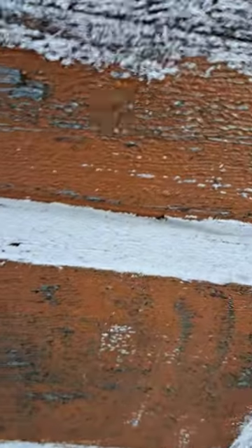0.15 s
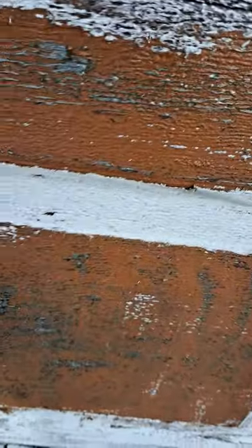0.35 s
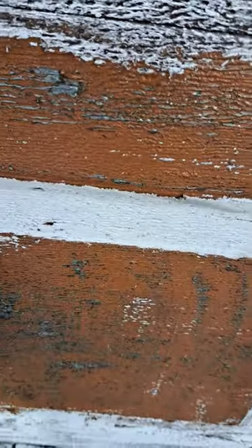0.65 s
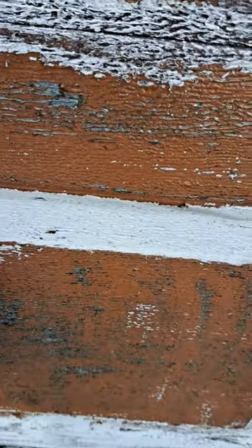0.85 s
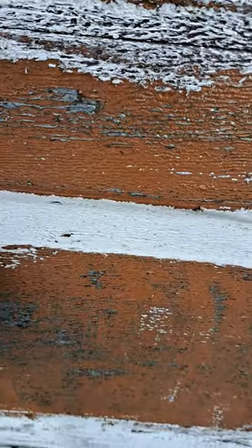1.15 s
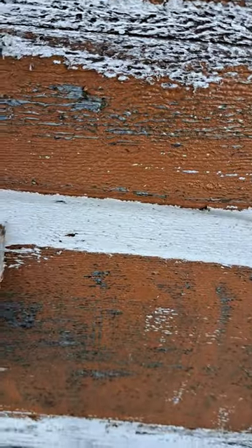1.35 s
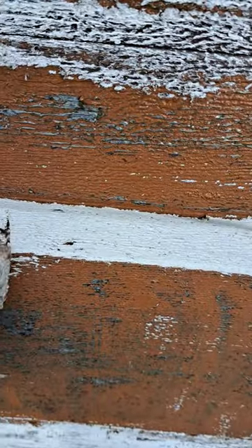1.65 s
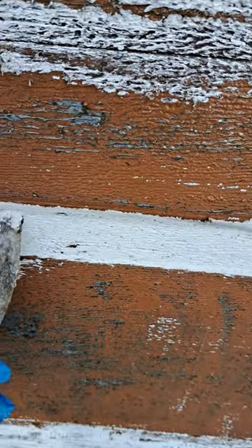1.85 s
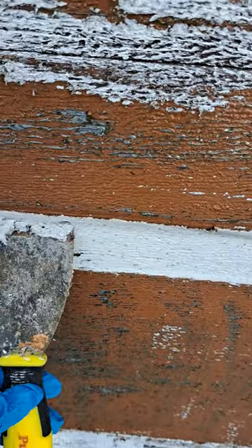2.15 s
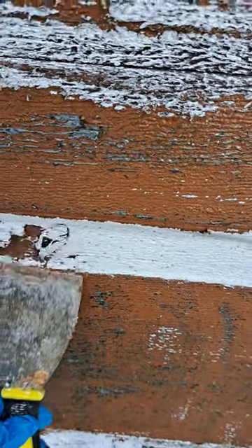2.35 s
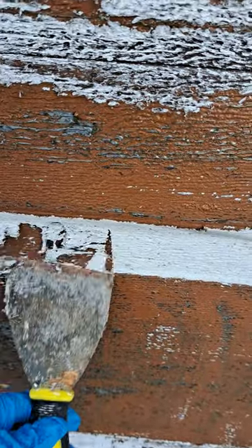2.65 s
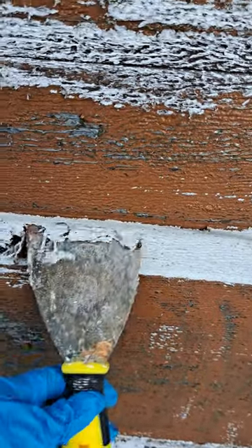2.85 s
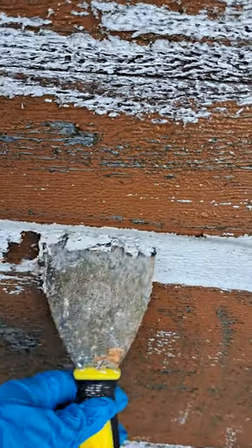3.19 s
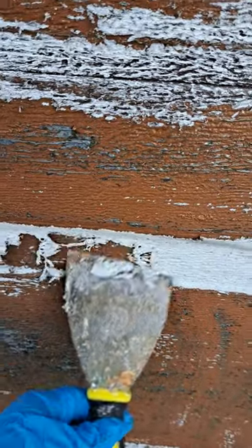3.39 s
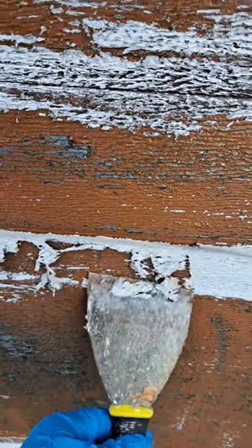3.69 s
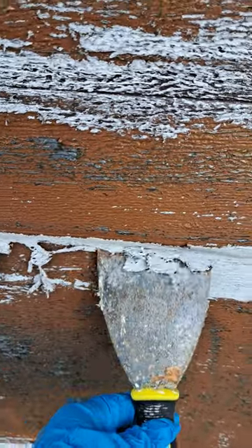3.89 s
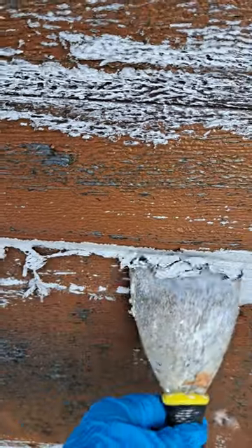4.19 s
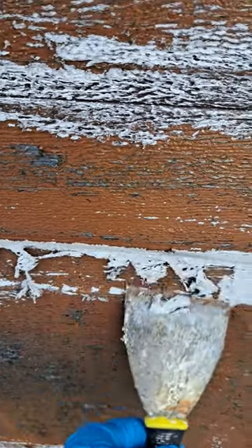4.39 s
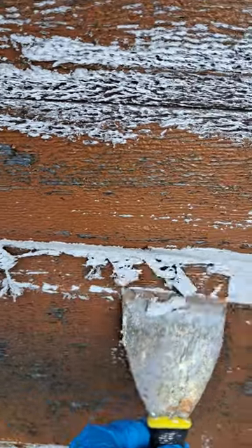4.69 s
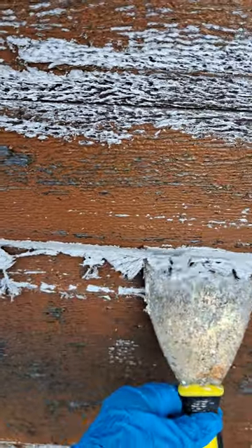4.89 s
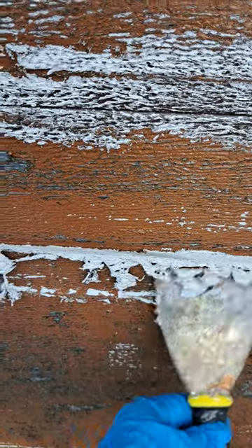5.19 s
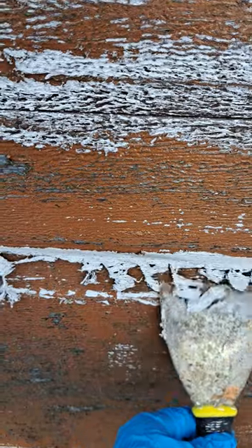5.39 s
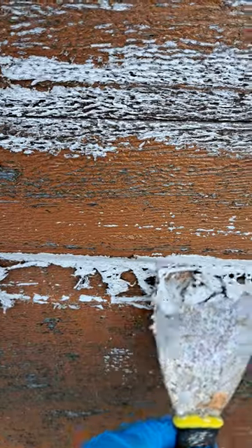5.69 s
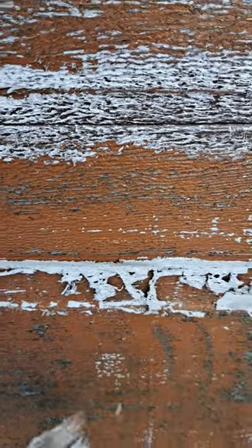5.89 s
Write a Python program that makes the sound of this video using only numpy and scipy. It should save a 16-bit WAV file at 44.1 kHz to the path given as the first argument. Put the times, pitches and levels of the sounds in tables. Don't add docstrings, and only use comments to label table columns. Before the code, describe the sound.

Very close stereo pickup of a metal scraper on a wooden door. First come low handling bumps and a soft bright cloth brush, then short gritty pushes that each end in a woody knock with a brief dull blade ring. Dry paint flakes snap and tick. Strokes settle into a quick regular to-and-fro, about three pushes a second, ending in hollow chatter. Faint workshop hum, small dry room.

```python
import sys
import numpy as np
from scipy import signal
from scipy.fft import rfft, irfft, next_fast_len
from scipy.io import wavfile

SR = 44100
rng = np.random.default_rng(int(sys.argv[2]) if len(sys.argv) > 2 else 0)


def invert_db(x):
    u = np.asarray(x, float) / 20
    return 10 ** u


def put_to_file(sound):
    columns = np.atleast_2d(sound).T
    safe = np.clip(columns, -1, 1)
    whole_steps = np.round(safe * 32767)
    wavfile.write(sys.argv[1], SR, whole_steps.astype(np.int16))


N = 266364
SIZE = next_fast_len(N + SR)
BINS_HZ = np.maximum(np.arange(SIZE // 2 + 1) * SR / SIZE, 1)
STEP = 64

# [f/Hz, level/dB]
FLOOR = [(15, -71), (25, 22.5), (124, 1), (296, -17), (510, -22), (584, -38), (927, -26), (1400, -31),
         (1800, -14), (2300, -28), (2900, -22), (9080, -29.5), (12600, -36), (15200, -43), (16500, -59)]
FLOOR_DB = -52
DUCK_S, DUCK_DB = 0.12, 1

# [f/Hz, level/dB per Hz]
HANDLING = [(0.0, -61), (0.27, -59.5), (0.32, -50), (0.41, -51), (0.46, -39.5), (0.56, -48), (0.62, -39.5),
            (0.8, -41), (0.87, -64), (0.93, -35), (1.25, -42.5), (1.6, -52.5), (1.83, -38), (2.2, -68),
            (2.54, -51.5), (3.3, -41.5), (4.1, -44.5), (4.3, -43), (4.9, -38), (5.3, -48.5), (5.68, -40.5),
            (5.85, -44), (6.04, -62)]
RUMBLE = [(20, -33), (45, 1.5), (90, -5), (130, -3), (170, -11), (230, -16.5), (330, -29.5), (600, -65)]
RUMBLE_ALIKE = 0.25

# [t/s, peak level/dB, f/Hz, left-right level/dB]
GRIPS = [(0.0, -41, 55, 3), (0.298, -22.5, 75.6, 0), (0.361, -29, 108, 3), (0.442, -28.5, 108, 29),
         (0.499, -26, 130, 17), (0.576, -27, 129, 16), (0.609, -26, 101, 15), (0.665, -32, 108, 0),
         (0.723, -22.5, 81.4, 12), (0.752, -22.5, 97, 7), (3.718, -29.5, 202, -43),
         (3.732, -18.5, 253, -33.5), (5.071, -28.5, 69.3, 19), (5.8, -30, 65, 19)]
GRIP_CYCLES = 6.4

# [t/s, bright hiss level/dB, narrow whistle level/dB]
SLEEVE = [
    (0.3, -78, -85),
    (0.4, -62, -60.5),
    (0.75, -74, -59),
    (0.93, -56, -58),
    (1.2, -62.5, -66),
    (1.45, -62, -75),
    (1.585, -71, -75),
    (1.6, -80, -80),
    (1.75, -83, -85),
]
# [f/Hz, level/dB per Hz]
SLEEVE_HISS = [(2000, -30), (3700, -6), (6000, -10), (9000, -11), (12400, -9), (15600, -9), (16500, -30)]
WHISTLE_HZ, WHISTLE_T60_S = 1760, 0.0045

# [f/Hz, left lead/rad]
PORT_BALANCE = [(60, -8), (150, 2.5), (380, -1), (950, -2.5), (2380, -6), (5980, -2), (15000, 1)]
PORT_PHASE = [(100, 0.056), (400, 0.29), (800, 0.64), (1400, 1.58), (3000, 1.62), (6000, 1.53),
              (10000, 2.15), (16000, 0.88)]
ROOM_T60_S, ROOM_DB, WALL_CUT_HZ = 0.17, -13.5, 1340

# [t/s, peak level/dB, brightness/dB per octave, tail level/dB]
FLAKES = [(0.108, -27.5, -0.5, 9), (0.198, -34, -7, -15), (0.24, -47, -4, -8), (0.384, -54.5, -3.5, 16.5),
          (0.4217, -45, -5, 9), (0.4646, -41, -2, -4), (0.697, -20.5, -3.5, -36), (0.771, -23.5, -8, -25),
          (0.967, -17.5, -6.5, 3.5), (1.018, -46, 2, -20), (1.178, -46, 3, -20), (1.2955, -45, -4, -15),
          (1.3379, -36, -5, 2), (1.4096, -35, -7, 6), (1.4955, -43, -6, -15), (1.5235, -42, 6, -15),
          (1.556, -40, 2, -10), (1.572, -36, 0, -15), (1.587, -47, -3, -20), (1.6816, -39, 0, -10),
          (1.7377, -12.5, -7, -9.5), (1.978, -38, -6, 9), (2.022, -13, -9, -17), (3.9873, -52, -10, -27),
          (4.064, -26.5, 1, -19), (4.9573, -21, -7.5, -14), (5.354, -24, 0.5, -25), (5.429, -40, 1, -4),
          (5.73, -23.5, -3.5, 9), (5.754, -9.5, -4.5, -10.5), (5.2942, -9, -1, -35), (5.59, -4.5, 1.5, -41)]
FLAKE_PAN_DB = -2
FLAKE_SCATTER = 0.7
FLAKE_BUMPS_DB, FLAKE_BUMP_HZ = 3, 500

# [t/s, peak level/dB]
CRACK = [
    (3.6665, -6),
]
# [f/Hz, level/dB, t60/s]
CRACK_MODES = [(2080, -6, 0.026), (2700, 1, 0.0057), (4100, 5.5, 0.0024), (4900, -6.5, 0.0017),
               (7000, 4.5, 0.0045), (8000, 14, 0.0034), (10520, 5.5, 0.0037), (12170, 8.5, 0.0027),
               (15200, -18, 0.0062)]

# [t/s, peak level/dB, f/Hz]
CHIPS = [(0.5796, -21, 2100), (0.774, -36, 3130), (1.081, -5, 1680), (1.4294, -36, 1740), (1.826, 1, 2050),
         (2.125, -0.5, 1600), (2.127, -14, 2060), (2.401, -8.5, 1750), (2.4558, -10, 1840),
         (2.5544, -28, 1680), (2.8065, -34, 1650), (2.8385, -13, 1710), (2.86, 0, 1716), (3.129, -11, 1670),
         (3.155, -16, 1600), (3.2994, -35, 1690), (3.4694, -23, 1740), (3.4944, -24, 2000),
         (3.8427, -30, 1600), (3.8601, -23, 1720), (3.875, -17, 1670), (4.1869, -22, 1730),
         (4.2118, -24, 1710), (4.2344, -16, 2000), (4.4184, -28, 1810), (4.5216, -20, 1810),
         (4.5444, -25, 1660), (4.8534, -19, 1670), (4.8844, -29, 1690), (4.9294, -33, 1520),
         (5.23, -31, 1730), (5.2644, -27, 1800), (5.545, -17, 1270), (5.545, -20, 1280),
         (5.563, -13.5, 1800), (5.8217, -18, 1820), (5.8644, -27, 1810), (5.8794, -33, 1450),
         (6.0033, -35, 1600)]
CHIP_CYCLES, CHIP_DB = 36, -6

# [t/s, peak level/dB,
# f/Hz, t60/s]
SLIPS = [(1.067, -13.5, 279, 0.11), (1.082, -14, 610, 0.021), (1.413, -35, 291, 0.065),
         (1.464, -18, 250, 0.065), (1.721, -21.5, 385, 0.043), (1.992, -26, 306, 0.057),
         (2.106, -33, 610, 0.035), (2.123, -10.5, 620, 0.024), (2.19, -9, 684, 0.053),
         (2.204, -40, 343, 0.079), (2.215, -21.5, 548, 0.095), (2.245, -27, 595, 0.064),
         (2.46, -23, 288, 0.034), (2.528, -16.5, 759, 0.12), (2.54, -20, 634, 0.1),
         (2.787, -31, 304, 0.059), (2.817, -19, 317, 0.034), (2.844, -11, 672, 0.068),
         (2.86, -17, 710, 0.067), (3.008, -15, 730, 0.04), (3.129, -27, 274, 0.072), (3.19, -20, 591, 0.13),
         (3.327, -23, 425, 0.053), (3.34, -34, 985, .12), (3.492, -10.5, 762, 0.06), (3.535, -26, 575, .1),
         (3.861, -30, 273, 0.032), (3.916, -16.5, 400, 0.1), (4.051, -31.5, 1084, 0.078),
         (4.27, -19, 407, 0.11), (4.34, -40, 990, 0.18), (4.395, -18, 282, 0.068), (4.422, -21, 630, 0.035),
         (4.597, -25, 380, 0.14), (4.713, -24, 386, 0.058), (4.877, -13, 392, 0.033),
         (5.217, -15, 322, 0.037), (5.294, -15.5, 996, 0.045), (5.325, -16.5, 283, .15),
         (5.36, -24, 330, 0.072),
         (5.36, -24, 330, 0.072), (5.498, -6, 438, 0.053), (5.521, -16, 406, 0.066),
           (5.545, -9, 381, 0.057), (5.565, -16, 386, 0.089), (5.591, -7, 428, 0.061),
           (5.751, -23, 448, 0.088), (5.814, -11, 344, 0.036), (5.841, -5, 401, 0.038),
           (5.857, -8, 392, 0.081), (5.873, -12, 395, 0.056), (5.889, -12, 373, 0.05),
           (5.88, -29, 780, 0.063), (5.845, -23.5, 727, 0.27), (5.854, -13, 1165, 0.035),
           (5.982, -13.5, 373, .06), (6.003, -33, 432, 0.029)]
SLIP_SAG, SLIP_SAG_S, SLIP_RISE_S = 0.057, 0.081, 0.004

# [f/Hz, level/dB, t60/s]
JOLT = [(72, -12, 0.13), (97, 0, 0.054)]
# [f/Hz, level/dB, t60/s]
THUMP = [(120.3, 11.5, 0.12), (141.7, 16, 0.07), (180, -25, .1), (233, -31, 0.39)]
# [f/Hz, level/dB, t60/s]
PANEL = [(208.2, -5, 0.3), (231.5, -8.5, 0.19), (275, -8.5, 0.19), (290, -5, 0.025), (311.8, 1, 0.06),
         (391.3, -2.5, 0.056), (435, -15.5, 0.31), (474.4, -13.5, 0.26), (546, -2, 0.053),
         (594.4, 1, 0.042), (658, -2.5, 0.053), (759, -3, 0.056), (1036, 1, 0.015), (1022, -5, 0.036),
         (1168, -8.5, 0.037)]
# [f/Hz, level/dB, t60/s]
BLADE = [(1250, 12.5, 0.002), (1670, 9, 0.01), (1750, 2, 0.019), (2030, -3.5, 0.024), (1940, 0, 0.0068),
         (2163, -0.5, 0.011), (2675, -12.5, 0.011), (3600, -38.5, 0.0029), (3917, -24, 0.011)]
# [f/Hz, level/dB per Hz]
GRIT = [(530, -2.5), (900, -10), (1480, -5.5), (1720, -8.5), (2210, -4.5), (2900, -14), (3560, -10.5),
        (5940, -18), (6460, -15.5), (9200, -27), (11600, -19), (15300, -24), (16500, -36)]
GRIT_EDGES_HZ = [300, 1500, 2600, 4200, 6500, 10000, 17000]
FLECK_DB, FLECK_PER_S = 2.8, 110
HAND_DAMPING = 0.72
PANEL_WANDER_DB = 3.0
JUDDER_DB = 2.0
SHUDDER_DB = -1.5

# [t/s, peak level/dB, thump level/dB, blade ring level/dB, flake level/dB]
STOPS = [(1.068, -7.5, -15, -5.5, -42), (1.825, 2.5, -13, -6, -3), (2.123, -14, -5, 3.5, -14),
         (2.185, 2, -7, -8.5, -2), (2.398, -15, -30, -6, -16), (2.529, -6, -7.5, -6, -7.5),
         (2.844, -7, -28, 3, -12), (2.86, -3.5, -36, 6, -11), (3.172, 0, -12, 0.5, 1),
         (3.518, 4.5, -10.5, -8.5, -28), (3.89, 4.5, -10, -6.5, -6.5), (4.255, 3, -12, -13, -10),
         (4.585, 3.5, -7.5, -14.5, -4.5), (4.916, -11.5, 2, -7, -23), (5.294, -3.5, -19, -1, -2.5),
         (5.591, -1.5, -9, -2, -3), (5.844, -23, -20, -27, -4)]
STOP_SOFT_MS = 0.55
STOP_TILT_DB, STOP_TAIL_DB, STOP_PAN_DB = -10.5, -14.5, -2
# [t/s, peak level/dB, blade ring level/dB]
TOUCHES = [(1.048, -10.5, -17), (2.348, -21.5, -19), (2.454, -9.5, -3), (2.806, -15.5, 6),
           (2.996, -23, -10), (3.007, -14, -20), (3.438, -6, 1.5), (4.05, -23.5, 4.5), (4.186, -13.5, 5.5),
           (4.514, -11, 2), (4.853, -11.5, 8), (5.244, -17, -16)]
TOUCH_THUMP_DB, TOUCH_SOFT_MS = -7, 0.78
# [t/s, peak level/dB, thump level/dB, contact softness/ms]
BUMPS = [(0.301, -43, 21.5, 1.7), (0.906, -3, 3, 2.66), (1.208, 2, -0.5, 3.55), (1.45, -9.5, 2, 3.4),
         (3.729, -15, 3.5, 0.76), (5.339, -7, -12, 4.1), (5.376, -23, -46, 2.1), (5.458, -11.5, -2.5, 0.66),
         (5.494, -11.5, -8, 1.9), (5.54, -9.5, -27, 0.95), (5.955, -7, -1.5, 2.2), (6.003, -21, -23, 0.59)]
BUMP_BLADE_DB = -17
KNOCK_LAG_S = 0.001523
REBOUND_S, REBOUND_DB = 0.00445, -9.5

# [t/s, lean level/dB, grit level/dB, contact point's favoured f/Hz, its tilt/dB per octave]
SLIDE = [(0.0, -55.5, -66.5, 278, 8.5), (0.45, -55, -62.5, 223, 6), (0.94, -53, -56.5, 217, 3),
         (1.15, -34, -54.5, 238, -2.5), (1.46, -41, -54.5, 254, -1), (1.58, -64, -54.5, 268, 7),
         (1.61, -47, -65, 272, 7.5), (1.75, -36.5, -54.5, 343, -1.5), (2.05, -34.5, -53, 265, 1.5),
         (2.25, -36, -54.5, 316, 1.5), (2.42, -33, -69, 260, -2.5), (2.62, -30, -54, 302, -0.5),
         (2.84, -33.5, -64.5, 294, 4), (3.22, -25.5, -58, 290, 2), (3.7, -31.5, -61, 275, 0),
         (4.3, -28.5, -59, 321, 0.5), (5.05, -39, -55.5, 352, 4.5), (5.33, -32.5, -59, 275, -2),
         (5.5, -33, -51, 364, -0.5), (5.68, -38, -57.5, 287, 1), (5.85, -42, -53, 380, 5),
         (6.04, -31.5, -56, 394, 1)]
SLIDE_BLADE_DB, BLADE_FOLLOWS = -55.5, 0.72
# [start t/s, end t/s, rasp level/dB at start, at end, panel level above it/dB]
PUSHES = [(1.037, 1.091, -40, -33, 11), (1.73, 1.831, -55, -24.5, 14.5), (2.106, 2.206, -40, -41, 13),
          (2.448, 2.54, -32.5, -45.5, 13.5), (2.519, 2.576, -23.5, -41.5, 6.5),
          (2.782, 2.861, -44.5, -20.5, 7.5), (3.114, 3.178, -42.5, -18, 5.5),
          (3.434, 3.488, -29.5, -39.5, 10), (3.49, 3.53, -16.5, -28.5, 1), (3.832, 3.894, -36, -25, 9.5),
          (4.177, 4.263, -35.5, -20, 7), (4.507, 4.575, -30.5, -34.5, 6.5), (4.839, 4.921, -29, -30.5, 4.5),
          (5.224, 5.3, -33.5, -34, 10), (5.549, 5.608, -32.5, -40, 15), (5.692, 5.845, -65, -34.5, 15.5),
          (5.855, 5.9, -24, -60, 6)]
# [start t/s, end t/s, rasp level/dB at start, at end, panel above it/dB]
PULLS = [(0.22, 0.31, -81.5, -100, 36.5), (0.572, 0.61, -48, -53, -22), (1.202, 1.262, -61.5, -75, 39.5),
         (1.389, 1.537, -38.5, -54, 14), (1.659, 1.758, -67, -42.5, 20), (1.956, 2.02, -52, -62, 24),
         (2.33, 2.384, -55.5, -44, 10.5), (2.676, 2.75, -43.5, -69, 14), (2.992, 3.056, -34.5, -57, 1),
         (3.295, 3.395, -52.5, -44, 10), (4.032, 4.088, -42.5, -48.5, 10), (4.365, 4.432, -55.5, -40, 12.5),
         (4.686, 4.761, -48, -41, 9.5), (5.105, 5.158, -50, -56, 18.5), (5.47, 5.551, -50.5, -41.5, 22),
         (5.973, 6.04, -45.5, -50, 19.5)]
PUSH_GRIT_DB, PULL_GRIT_DB = -16.5, -14
DRAG_S, DRAG_DB = 0.0098, -11
SAG_S, SAG_OCTAVES = 0.0026, 0.16
LIFT_BEFORE_S, LIFT_S = 0.031, 0.015
LIFT_DB = [
    [-4],
    [0],
    [-5],
]
TURN_AFTER_S, TURN_S = 0.054, 0.023
TURN_DB = [
    [6],
    [-7],
    [-2],
]

TOP_HZ = 15700


def rms_one(x):
    return x / np.sqrt(np.mean(x ** 2) + 1e-20)


def in_time(rows, step=1):
    s, *columns = np.transpose(rows)
    return [np.interp(np.arange(0, N, step) / SR, s, column) for column in columns]


def at_bins(points):
    hz, value = np.transpose(points)
    return np.interp(np.log(BINS_HZ), np.log(np.maximum(hz, 10)), value)


def through(x, response):
    return irfft(rfft(x, SIZE) * response, SIZE)[..., :N]


def causal(spectrum):
    cepstrum = irfft(np.log(invert_db(at_bins(spectrum))), SIZE)
    cepstrum[1:SIZE // 2] *= 2
    cepstrum[SIZE // 2 + 1:] = 0
    response = np.exp(rfft(cepstrum))
    return response / np.sqrt(np.mean(np.abs(response) ** 2))


def highpass(x, hz, order=2):
    return signal.sosfilt(signal.butter(order, hz, "high", fs=SR, output="sos"), x)


def fade(x, seconds, step=1):
    lag = np.exp(-step / (seconds * SR))
    return signal.lfilter([1 - lag], [1, -lag], x)


def drift(rate, step=1):
    return np.interp(np.arange(0, N, step) * rate / SR, np.arange(2000), rng.standard_normal(2000))


def dips(times, width_s):
    t = np.arange(0, N, STEP) / SR
    return np.repeat(sum(np.exp(-((t - s) / width_s) ** 2) for s in times), STEP)[:N]


def ring(clicks, hz, t60):
    r, w = invert_db(-60 / (t60 * SR)), 2 * np.pi * hz / SR
    return signal.lfilter([0, np.sin(w)], [1, -2 * r * np.cos(w), r * r], clicks + 1e-18)


def stereo_noise(spectrum, alike):
    mid, side = through(rng.standard_normal((2, N)), causal(spectrum))
    alike = np.clip(alike, 0, 1)
    return np.sqrt((1 + alike) / 2) * mid + np.sqrt((1 - alike) / 2) * side * [[1], [-1]]


def floor(near):
    duck_db = DUCK_DB * np.tanh(fade(np.abs(near[0]), DUCK_S) / invert_db(-24.5))
    level_db = FLOOR_DB - 0.5 + duck_db + 0.72 * drift(4.2)
    return invert_db(level_db) * stereo_noise(FLOOR, alike=0.33)


def rumble():
    level_db = in_time(HANDLING)[0] + 9.5 + 2.7 * drift(16)
    return invert_db(level_db) * stereo_noise(RUMBLE, alike=RUMBLE_ALIKE)


def sleeve():
    hiss_db, whistle_db = in_time(SLEEVE)
    whistle = rng.standard_normal((2, N))
    for _ in range(2):
        whistle = ring(whistle, WHISTLE_HZ, WHISTLE_T60_S)
    hiss = invert_db(hiss_db + 1.2 * drift(44.5)) * stereo_noise(SLEEVE_HISS, alike=0.26)
    return hiss + invert_db(whistle_db) * rms_one(whistle)


def thud(s, db, hz, t60):
    t = np.arange(SR // 5) / SR
    turns = hz * (t + SLIP_SAG * SLIP_SAG_S * (1 - np.exp(-t / SLIP_SAG_S)))
    wave = -0.89 * np.sin(2 * np.pi * turns)
    out, at = np.zeros(N + SR), int(max(s, 0) * SR)
    out[at:at + len(t)] = wave * invert_db(db - 60 * t / t60) * np.minimum(t / SLIP_RISE_S, 1)
    return out[:N]


def grips():
    return sum(thud(s, db, hz, GRIP_CYCLES / hz) * invert_db([[pan_db / 2], [-pan_db / 2]])
               for s, db, hz, pan_db in GRIPS)


def room(x):
    hz = BINS_HZ[::8]
    lags = rng.uniform(0.006, 0.025, (2, 8, 1))
    loss = invert_db(-60 * lags / ROOM_T60_S) / (1 + 1j * hz / WALL_CUT_HZ)
    loop = loss * np.exp(-2j * np.pi * hz * lags)
    signs = (-1) ** np.arange(8)[:, None]
    echoes = irfft(np.sum(loop / (1 - loop) * signs, axis=1))
    return invert_db(ROOM_DB) * signal.oaconvolve(x, echoes, axes=1)[:, :N]


def ports(x):
    half = invert_db(at_bins(PORT_BALANCE) / 2) * np.exp(0.5j * at_bins(PORT_PHASE))
    return through(x, np.array([half, 1 / half]))


def breaks():
    loose = [(*row, FLAKE_PAN_DB) for row in FLAKES]
    jammed = [(s, db, STOP_TILT_DB, STOP_TAIL_DB, STOP_PAN_DB) for s, *_, db in STOPS]
    return loose + jammed


def snaps():
    events = breaks()
    length = SR // 6
    t = np.arange(length) / SR
    hz = np.maximum(np.arange(length // 2 + 1) * SR / length, 1500)
    out, noise = np.zeros((2, N + SR)), rng.standard_normal((len(events), 2, length))
    for (s, db, tilt_db, tail_db, pan_db), burst in zip(events, noise):
        bumps = np.interp(hz / FLAKE_BUMP_HZ, np.arange(60), burst[1, -60:])
        colour_db = tilt_db * np.log2(hz / 6000) + FLAKE_BUMPS_DB * bumps
        decay = invert_db(-60 * t / 0.028) + invert_db(tail_db - 60 * t / 0.091)
        shape = decay * np.minimum(t / 0.0031, 1)
        scattered = burst[0] + FLAKE_SCATTER * burst[1] * [[1], [-1]]
        tilted = rms_one(irfft(rfft(scattered) * invert_db(colour_db), length))
        at = int(s * SR)
        out[:, at:at + length] += tilted * shape * invert_db(db - 10.0 + pan_db * np.array([[0.5], [-0.5]]))
    return highpass(out[:, :N], 1200)


def crack():
    (s, db), = CRACK
    t = np.arange(N) / SR - s
    shared, own = rng.standard_normal((2, N)) * (t > 0)
    scatter = shared + 0.3 * own * [[1], [-1]]
    rung = sum(ring(scatter * invert_db(db + level_db - 26.5 - 60 * np.abs(t) / 0.023), hz, t60)
               for hz, level_db, t60 in CRACK_MODES)
    echoes = np.diff(scatter * invert_db(db - 29 - 60 * np.abs(t) / 0.15), prepend=0, axis=1)
    return highpass(rung + echoes, 1650, order=4)


def chips():
    return sum(thud(s, db + CHIP_DB, hz, CHIP_CYCLES / hz) for s, db, hz in CHIPS)


def slips():
    return sum(thud(*row) for row in SLIPS)


def contacts():
    stops = [(*row[:4], STOP_SOFT_MS) for row in STOPS]
    touches = [(s, db, TOUCH_THUMP_DB, ring_db, TOUCH_SOFT_MS) for s, db, ring_db in TOUCHES]
    bumps = [(s, db, thump_db, BUMP_BLADE_DB, soft_ms) for s, db, thump_db, soft_ms in BUMPS]
    return stops + touches + bumps


def knocks(column, trim_db):
    out = np.zeros(N + SR)
    for row in contacts():
        push = np.hanning(int(np.clip(row[4], 0.1, 6) * SR / 1000) + 3)
        at = int((row[0] + KNOCK_LAG_S) * SR)
        level_db = row[1] + trim_db + (row[column] if column > 1 else 0)
        out[at:at + len(push)] += push / push.sum() * invert_db(level_db)
    back = int(REBOUND_S * SR)
    return out[:N] + invert_db(REBOUND_DB) * np.pad(out[:N - back], (back, 0))


def body(modes, rasp, blows, wander_db, blow_wander_db, colour_db=lambda hz: 0):
    energy = sum(invert_db(2 * db) * t60 * SR / (4 * np.log(1000)) for hz, db, t60 in modes)
    height = sum(invert_db(db) for hz, db, t60 in modes)
    out = 0
    for k, (hz, db, t60) in enumerate(modes):
        level_db, chance = db + colour_db(hz), drift(22, STEP)
        gains = invert_db([level_db + wander_db * chance, level_db + blow_wander_db * chance])
        rubbed, struck = np.repeat(gains, STEP, axis=1)[:, :N]
        force = rubbed * rasp / np.sqrt(energy) * (-1) ** k - struck * blows / height
        out = out + ring(force, hz, t60)
    return highpass(out, modes[0][0] * 0.91)


def jolt():
    return body(JOLT, 0, knocks(column=1, trim_db=-14.5), 0, 1.0) * invert_db([[2.5], [-3.5]])


def damped(modes):
    return [(hz, db, t60 * HAND_DAMPING) for hz, db, t60 in modes]


def catches(per_s, spread_db):
    sizes = invert_db(spread_db * np.minimum(rng.exponential(1, N), 5)) * rng.choice([-1, 1], N)
    return rms_one(sizes * (rng.random(N) < per_s / SR))


def flecked(x, patchy_db):
    out = 0
    for k, edges in enumerate(zip(GRIT_EDGES_HZ, GRIT_EDGES_HZ[1:])):
        band = signal.sosfilt(signal.butter(2, edges, "band", fs=SR, output="sos"), x)
        out = out + (-1) ** k * invert_db(patchy_db * drift(FLECK_PER_S)) * band
    return out


def pressure():
    gains = np.zeros((3, N))
    for rows, grit_db in (PUSHES, PUSH_GRIT_DB), (PULLS, PULL_GRIT_DB):
        for start, end, from_db, to_db, panel_db in rows:
            span = slice(int(start * SR), min(int(end * SR), N))
            way = np.linspace(0, 1, span.stop - span.start)
            rasp_db = from_db + way * (to_db - from_db)
            gains[:, span] += invert_db([rasp_db + panel_db, rasp_db, rasp_db + grit_db - 5.0 * (1 - way)])
    lean_db, crumble_db = in_time(SLIDE)[:2]
    blade_db = SLIDE_BLADE_DB + BLADE_FOLLOWS * (lean_db + 40) + 0.24 * (crumble_db + 62.0)
    starts, ends = np.transpose(PUSHES)[:2]
    lift_db = LIFT_DB * dips(starts - LIFT_BEFORE_S, LIFT_S)
    turn_db = TURN_DB * dips(ends + TURN_AFTER_S, TURN_S)
    slide = invert_db(lift_db + turn_db + [lean_db, blade_db, crumble_db])
    slide[0] += invert_db(DRAG_DB) * fade(gains[0], DRAG_S)
    return fade(gains, 0.0064) + invert_db(-5.5) * slide


def contact(panel_gain):
    pressed = np.tanh(fade(panel_gain[::STEP], SAG_S, STEP) / invert_db(-21.5))
    favoured_hz, tilt_db = in_time(SLIDE, STEP)[2:]
    favoured_hz = favoured_hz * 2 ** (SAG_OCTAVES * (pressed - 0.5))
    tilt_db = tilt_db + 5.8 * (pressed - 0.5)

    def feed_db(hz):
        peak = np.exp(-(np.log2(hz / favoured_hz) / 0.26) ** 2)
        return tilt_db * np.log2(hz / 350) + 9.1 * peak
    return feed_db


def door():
    panel_gain, blade_gain, grit_gain = pressure()
    judder = invert_db(JUDDER_DB * drift(70))
    ticks = catches(per_s=280, spread_db=1.0)
    edge = catches(per_s=2000, spread_db=2.0) * judder * invert_db(-5.5)
    panel = body(damped(PANEL), edge * panel_gain, knocks(column=1, trim_db=2.5),
                 PANEL_WANDER_DB, 0.96, colour_db=contact(panel_gain))
    shudder = edge * invert_db(SHUDDER_DB) * fade(panel_gain, 0.029)
    thump = body(damped(THUMP), shudder, knocks(column=2, trim_db=-0.5), PANEL_WANDER_DB, 0.45)
    fine = catches(per_s=1400, spread_db=-1.5) * judder * invert_db(-1.5) + invert_db(-9.5) * ticks
    fine = fine + invert_db(2.0) * judder * rng.standard_normal((2, N))
    blade = body(BLADE, fine * blade_gain, knocks(column=3, trim_db=10.0), 2.24, 3.9)
    crumbs = catches(per_s=3000, spread_db=5.0) * judder * invert_db(2.9 * drift(180) + 4.0)
    crumbs = crumbs + invert_db(-32.0) * ticks
    scattered = invert_db(6.0) * judder * rng.standard_normal((2, N))
    grit = through((crumbs + scattered) * grit_gain, causal(GRIT))
    return panel + thump + blade + flecked(grit, patchy_db=FLECK_DB)


def scene():
    near = ports(door() + slips() + chips() + crack() + snaps())
    background = floor(near) + rumble() + sleeve() + grips()
    return background + jolt() + near + room(near)


def low_pass(x):
    return signal.sosfilt(signal.butter(12, 16790, fs=SR, output="sos"), x)


def record(dry):
    cut = highpass(dry, 42)
    rounded = 1.15 * np.tanh(1.06 * cut / 1.15)
    top = signal.cheby2(14, 40.0, TOP_HZ, fs=SR, output="sos")
    return low_pass(signal.sosfilt(top, rounded))


dry = scene()
out = record(dry)
put_to_file(out)
```